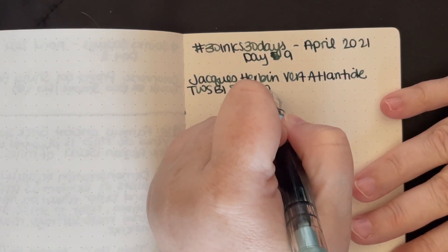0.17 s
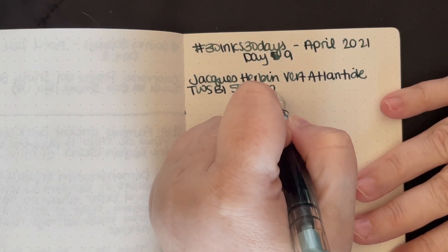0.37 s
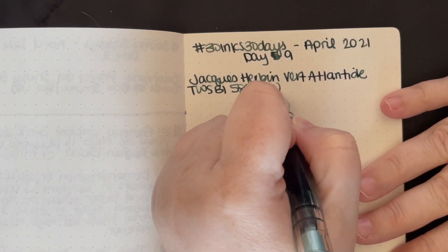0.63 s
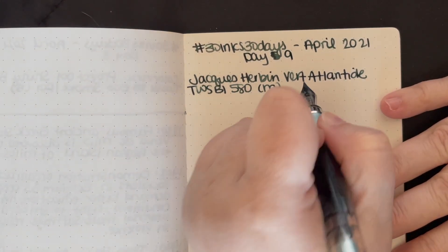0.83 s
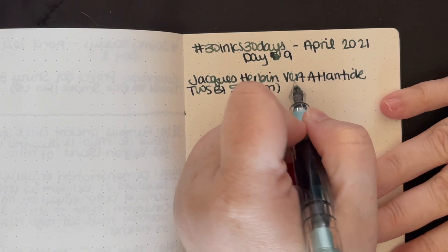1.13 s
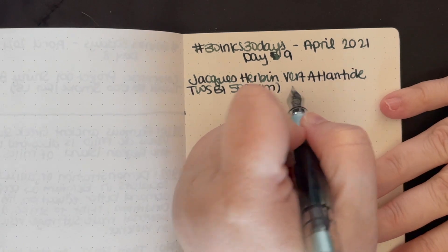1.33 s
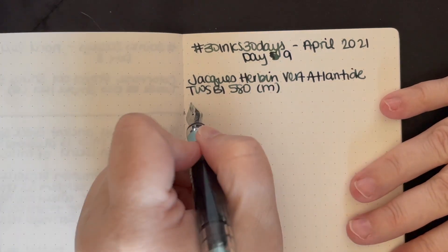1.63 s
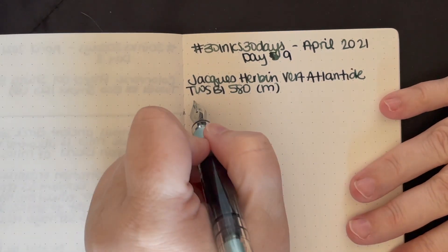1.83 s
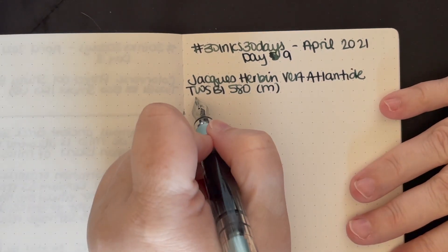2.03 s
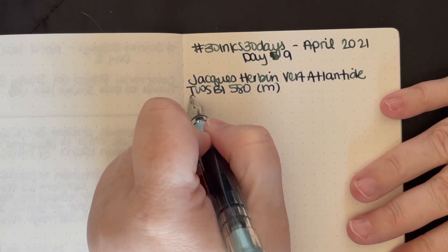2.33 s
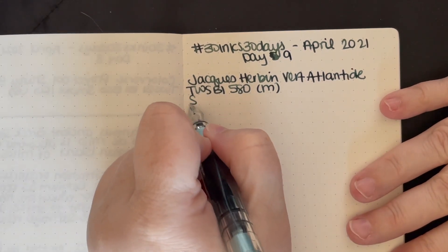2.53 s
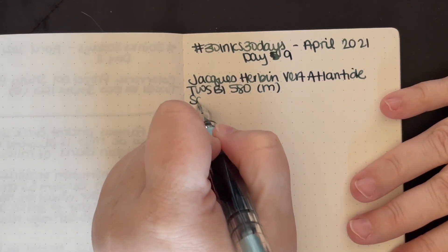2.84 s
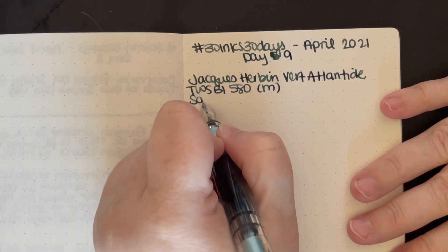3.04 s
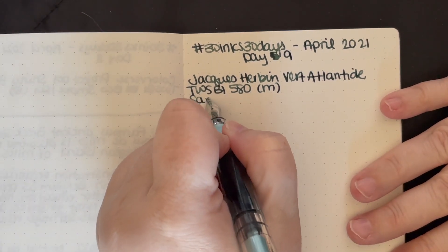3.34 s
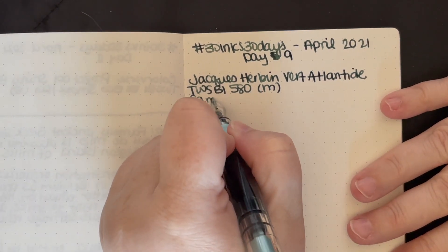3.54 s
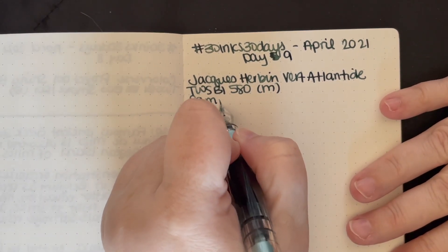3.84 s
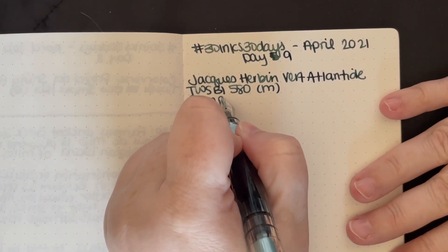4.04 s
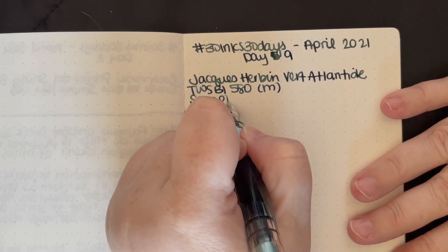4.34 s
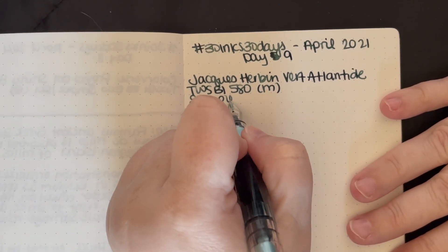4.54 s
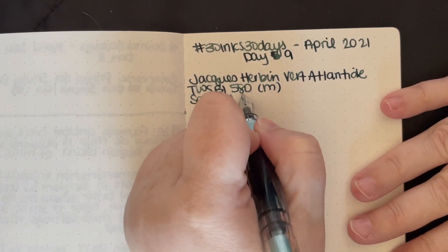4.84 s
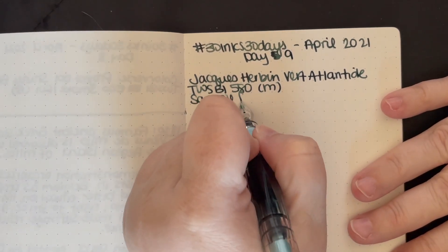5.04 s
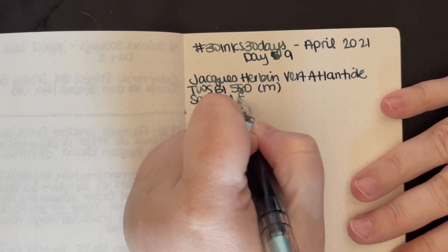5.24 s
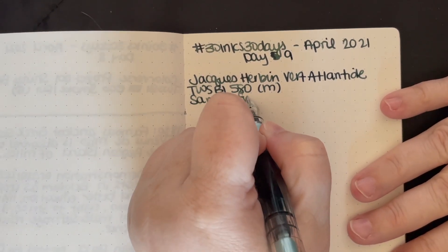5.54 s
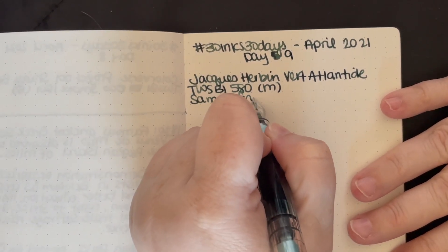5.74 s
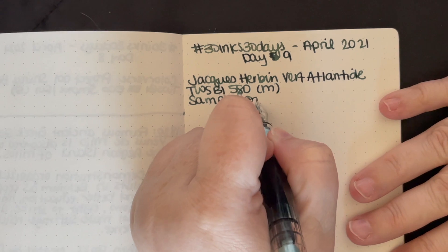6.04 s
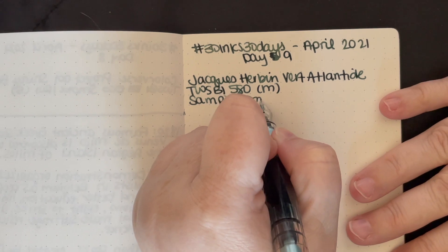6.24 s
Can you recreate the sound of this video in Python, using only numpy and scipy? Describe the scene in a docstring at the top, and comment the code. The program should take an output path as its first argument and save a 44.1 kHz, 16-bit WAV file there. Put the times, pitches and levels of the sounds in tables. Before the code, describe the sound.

Close up at a desk, skin slides softly across a notebook page a few times. A fountain pen then whispers through a run of small strokes, catching on paper fibres and tapping the page twice. Near the end the hand swishes again and the nib gives a faint, high, wavering tone as the writing continues. A steady low hum and airy hiss fill the quiet room.

```python
"""A hand brushes softly over paper, close to the microphone, at a desk in a quiet room.
Behind it lie ventilation, mains hum and microphone hiss, and the stand sways with the desk.
A fountain pen writes in the notebook: the wet nib whispers over the fibres, catches on some and
twice knocks on the page; late on, a thin tone wavers across several strokes. Between letters the
side of the hand slides along the paper."""
import sys
import numpy as np
from scipy import signal
from scipy.fft import rfft, irfft
from scipy.io import wavfile
from scipy.ndimage import map_coordinates

SR = 44100
rng = np.random.default_rng(int(sys.argv[2]) if len(sys.argv) > 2 else 0)


def to_wav(s):
    """Save 16-bit WAV."""
    ch = np.atleast_2d(s).T  # columns
    pcm = np.round(np.clip(ch, -1, 1) * 32767)  # PCM
    wavfile.write(sys.argv[1], SR, pcm.astype(np.int16))


N = 281799
TIME = np.arange(N) / SR

# the resting hand creeps: (start [s], rise [s], fall [s], level [dB], centre [Hz], width [Hz])
HAND_CREEPS = [(-.05, 0.12, 0.44, -63, 3720, 2700), (-.03, 0.12, 0.26, -63, 1280, 600),
               (.105, .035, 0.11, -63.5, 5400, 4200), (1.7, 0.55, 0.57, -70.5, 2050, 706),
               (4.75, 0.35, 1.8, -72.5, 1800, 804)]
# ventilation and microphone hiss: (frequency [Hz], relative density [dB])
AIR_SPECTRUM = [(25, -70.5), (50, -78), (85, -86.5), (150, -85.5), (205, -79.5), (240, -83.5), (330, -85),
                (380, -88), (450, -85), (660, -92), (800, -97.5), (1100, -94), (1450, -96.5),
                (1900, -101.5), (2600, -106.8), (7000, -106.8), (16000, -107.3)]
# mains lines, and a motor just below mains speed beating against them: (frequency [Hz], rms level [dB])
HUM_LINES = [(59.2, -77), (177.4, -62.5), (180, -60), (296, -73), (299.9, -63), (355.3, -68.5),
             (414.6, -68), (473.5, -75.5), (533, -85)]
# stand sway, strongest as the arm swings back to a new line and late in the word: (time [s], level [dB])
SWAY_LEVELS = [(0, -45), (.78, -42.5), (1.15, -47), (1.6, -37), (2.0, -52), (3.6, -43), (4.9, -39),
               (6.39, -41)]
# rumble of the swaying stand: (frequency [Hz], relative density [dB])
STAND_SPECTRUM = [(3, -14), (7, 2), (12, 0), (15, -7), (19.5, 0.5), (23, -15.5), (40, -32), (80, -65.5)]
# the hand slides: (start [s], rise [s], fall [s], hiss [dB], top octave against hiss [dB],
# low rub [dB], low edge of the hiss [Hz], pitch of the hollow [ratio])
HAND_SLIDES = [(.22, 0.047, 0.083, -57.5, -6, -61.5, 2400, 0.94),
               (.649, 0.018, 0.11, -54.5, -2.5, -70, 2400, 1),
               (1.296, 0.043, 0.12, -52, -1, -65, 2400, 0.996),
               (1.433, 0.057, 0.083, -47.5, -4.5, -58, 4000, 1.02),
               (4.553, 0.07, 0.08, -48, 0, -53.5, 3650, 1.03), (5.596, .016, 0.09, -60, 0, -68, 3500, 1.15)]
# hollow between hand and page, in three ranges: (frequency [Hz], width [Hz], relative level [dB])
HOLLOW_HISS_MODES = [(3080, 1100, 3.5), (4490, 820, 8), (5490, 800, 8), (7970, 1300, 8), (8900, 730, -1)]
HOLLOW_TOP_MODES = [(11860, 2300, -1.8), (14200, 1400, -0.66)]
HOLLOW_RUB_MODES = [(930, 380, 6.1), (1420, 110, 10.6), (1720, 1430, 0.83)]
# the nib catches on a fibre: (time [s], level [dB], centre [Hz], width [Hz], decay [s])
FIBRE_CATCHES = [(.246, -54, 12000, 7000, 0.0044), (0.801, -53.5, 2400, 2400, 0.0059),
                 (3.106, -59, 6000, 6500, .003), (3.228, -66, 8100, 450, .018),
                 (3.232, -63, 12500, 4000, 0.0084), (3.714, -62, 6000, 7000, 0.0042),
                 (4.19, -59, 13600, 2500, .003), (4.4, -60.5, 11500, 2030, .005),
                 (5.608, -61, 8030, 120.5, 0.028), (5.606, -55, 14200, 2500, 0.016)]
# strokes of the pen: (middle [s], length [s], scratch level [dB])
PEN_STROKES = [(0.54, 0.13, -66), (2.077, 0.11, -67.5), (2.229, 0.056, -68), (2.308, 0.077, -67),
               (2.369, 0.086, -65.5), (2.43, 0.057, -65.5), (2.487, 0.072, -66), (2.675, 0.084, -73),
               (2.772, .11, -63.5), (2.863, 0.081, -69.5), (2.974, 0.074, -67), (3.154, 0.095, -68.5),
               (3.253, 0.075, -68.5), (3.357, .1, -66.5), (3.48, 0.087, -69.5), (3.585, .11, -68),
               (3.785, 0.059, -68.5), (3.903, 0.087, -70), (4.03, 0.095, -69.5), (4.272, .1, -69.5),
               (4.359, 0.089, -69.5), (4.475, 0.058, -69), (4.81, 0.097, -67), (4.947, .13, -68),
               (5.117, .07, -75), (5.198, 0.066, -67.5), (5.358, .11, -73), (5.582, 0.077, -67.5),
               (5.69, 0.13, -69.5), (5.895, .07, -69.5), (6.016, 0.15, -74.5), (6.155, .06, -69.5),
               (6.28, 0.06, -70), (6.375, .045, -68)]
# nib, barrel and page under friction: (frequency [Hz], width [Hz], relative level [dB])
NIB_RESONANCES = [(4220, 480, 8.5), (5000, 360, 3), (5560, 490, 6), (7150, 350, 2.5), (7970, 620, 7),
                  (8650, 490, -11), (11700, 2500, -2), (14700, 1100, -12)]
BARREL_RESONANCES = [(3100, 340, -1.8), (3350, 310, 0)]
PAGE_RESONANCES = [(766, 320, 2), (1054, 205, 1.5), (1320, 470, -6), (1990, 210, -7.5)]
# the barrel's ring follows the grip: (time [s], level against the scratch [dB], pitch [ratio])
BARREL_GRIP = [(.54, -5, 0.96), (2.1, -18, 0.92), (2.22, 0.5, .98), (2.36, -.5, 1), (2.43, -5, 1),
               (2.49, -0.5, 1.06), (2.78, -3.5, 0.98), (2.97, 2, 1.05), (3.15, .5, 1), (3.3, -3.5, 1),
               (3.78, -3.5, 1), (3.9, 3, 1.04), (4.05, -6, 0.94), (4.8, -4, 1.02), (6.39, -5.5, 0.98)]
# the page gives under the pen and rubs hollowly: (middle [s], length [s], level [dB])
PAGE_GIVES = [(0.534, 0.13, -59.5), (2.358, 0.049, -58.5), (2.974, 0.043, -60)]
# the nib knocks: (time [s], push [dB], contact cut-off [Hz], bass cut-off [Hz], pad pitch [ratio])
NIB_KNOCKS = [(2.5123, -27, 1830, 238, 1.005), (4.6248, -28.5, 2320, 1400, 1.11)]
# pad and desk under a knock: (frequency [Hz], relative level [dB], t60 [s])
PAD_RESONANCES = [(380, -13, 0.032), (647, -4, 0.012), (1065, -0.5, 0.0058), (1470, -17, 0.011),
                  (1793, -11, 0.015)]
# short chirps around the long squeak: (start [s], length [s], pitch [Hz], glide [Hz/s], rms level [dB])
TINE_CHIRPS = [(4.909, 0.092, 4300, -1500, -75), (5.056, .11, 4120, 5000, -74),
               (5.616, 0.078, 5300, -6000, -78)]
# a thin, wavering tone near 5 kHz, held across several strokes: (time [s], pitch [Hz], rms level [dB])
TINE_SQUEAK = [(5.175, 5100, -92), (5.19, 5130, -70), (5.24, 5150, -71), (5.31, 5020, -77),
               (5.39, 5060, -75), (5.44, 5230, -71), (5.485, 5320, -82), (5.53, 5350, -90)]


def from_db(db):
    """Decibels to gain."""
    return 10 ** (np.asarray(db) / 20)


def rms_one(x):
    """Scale to rms 1."""
    return x / np.sqrt(np.mean(x ** 2) + 1e-20)


def drift(rate):
    """Random wander of rms 1 that changes about rate times a second."""
    hz = np.arange(N // 2 + 1) * SR / N
    return rms_one(irfft(rfft(rng.standard_normal(N)) / (1 + (hz / rate) ** 2), N))


def coloured_noise(spectrum):
    """Noise of rms 1 with the given outline: (frequency [Hz], relative density [dB])."""
    hz, db = np.transpose(spectrum)
    bins = np.maximum(np.arange(N // 2 + 1) * SR / N, 1)
    gain = from_db(np.interp(np.log(bins), np.log(hz), db))
    return rms_one(irfft(rfft(rng.standard_normal(N)) * gain, N))


def cut(x, hz, kind, order=2):
    """Butterworth low- or high-pass."""
    return signal.sosfilt(signal.butter(order, hz, kind, fs=SR, output="sos"), x)


def resonate(x, hz, width):
    """One resonance with gain 1 on top; two broad stages in a row give it steep skirts."""
    r = np.exp(-np.pi * width * (np.pi / 2) / SR)
    gain = (1 - r * r) / 2
    return signal.sosfilt([[gain, 0, -gain, 1, -2 * r * np.cos(2 * np.pi * hz / SR), r * r]] * 2, x)


def ring(x, hz, t60):
    """A unit click sets a sine of height 1 ringing."""
    r, w = np.exp(-np.log(1000) / (t60 * SR)), 2 * np.pi * hz / SR
    return signal.lfilter([0, np.sin(w)], [1, -2 * r * np.cos(w), r * r], x + 1e-18)


def bend(x, ratio):
    """Shift the pitch of a steady sound by a ratio that changes with time."""
    return map_coordinates(x, [np.cumsum(ratio)], order=3, mode="mirror")


def friction(modes, slips_per_s, spread_db, pitch=1, size=N):
    """Countless tiny slips of uneven size drive each resonance; rms 1."""
    out = 0
    for hz, width, db in modes:
        sizes = from_db(spread_db * np.minimum(rng.exponential(1, size), 4))
        slips = sizes * rng.choice([-1, 1], size) * (rng.random(size) < slips_per_s / SR)
        out = out + from_db(db) * resonate(slips, hz * pitch, width)
    return rms_one(out)


def swell(start, rise, fall):
    """Speed of one hand movement: from rest up to 1 and back to rest."""
    return np.sin(np.pi / 2 * np.interp(TIME, [start, start + rise, start + rise + fall], [0, 1, 0]))


def hand_creeps():
    """Slow skin on paper, close up: a soft, broad brushing."""
    out = np.zeros(N)
    for start, rise, fall, db, hz, width in HAND_CREEPS:
        brush = friction([(hz, width, 0)], slips_per_s=10000, spread_db=-5.5)
        out += from_db(db) * swell(start, rise, fall) * brush
    return out


def room_air(level_db):
    """Steady ventilation in the room, with the microphone's own hiss."""
    return from_db(level_db) * coloured_noise(AIR_SPECTRUM)


def mains_hum(buzz_hz, buzz_start_db, growth_db_per_s, waver_db, wander_rad):
    """An appliance's mains and motor lines waver; its magnetic buzz at twice mains pitch slowly grows."""
    out = np.zeros(N)
    for hz, db in [(buzz_hz, buzz_start_db + growth_db_per_s * TIME), *HUM_LINES]:
        height = np.sqrt(2) * from_db(db + waver_db * drift(2.1))
        phase = 2 * np.pi * (hz * TIME + rng.random()) + wander_rad * drift(3.0)
        out += height * np.sin(phase)
    return out


def stand_sway():
    """The microphone stand sways with the desk: a very deep rumble."""
    s, db = np.transpose(SWAY_LEVELS)
    return from_db(np.interp(TIME, s, db)) * coloured_noise(STAND_SPECTRUM)


def hand_slides(flutter_db):
    """Skin swishes over the page, swelling and fading with the speed of each slide."""
    out, size = np.zeros(N), SR // 4
    for start, rise, fall, hiss_db, top_db, rub_db, edge_hz, pitch in HAND_SLIDES:
        hiss, top, rub = [friction(modes, slips_per_s=9200, spread_db=2.5, pitch=pitch, size=size)
                          for modes in (HOLLOW_HISS_MODES, HOLLOW_TOP_MODES, HOLLOW_RUB_MODES)]
        treble = (cut(hiss, edge_hz, "high", order=8) + from_db(top_db) * top) / np.sqrt(2)
        swish = from_db(hiss_db) * treble + from_db(rub_db) * rub
        span = slice(round(start * SR), round(start * SR) + size)
        out[span] += swell(start, rise, fall)[span] ** 2 * swish
    return out * from_db(flutter_db * drift(45))


def fibre_ticks():
    """A fibre caught by the nib lets go with a tiny dry rasp."""
    out = np.zeros(N)
    for s, db, hz, width, decay in FIBRE_CATCHES:
        fade = (TIME >= s) * np.exp(-np.maximum(TIME - s, 0) / decay)
        out += from_db(db) * fade * rms_one(resonate(rng.standard_normal(N), hz, width))
    return out


def stroke(middle, length):
    """Loudness of one stroke: the root of the nib's speed, which rises and falls as a half sine."""
    out = np.zeros(N)
    down = np.abs(TIME - middle) < length / 2
    out[down] = np.sqrt(np.cos(np.pi * (TIME[down] - middle) / length))
    return out


def nib_scratch(flutter_db, tilt_wander, page_db):
    """The nib drags over the fibres and sets barrel and page ringing; grip and tilt bend the pen's pitch."""
    scratch, barrel, page = [friction(modes, slips_per_s=4500, spread_db=4.0)
                             for modes in (NIB_RESONANCES, BARREL_RESONANCES, PAGE_RESONANCES)]
    drag = sum(from_db(db) * stroke(middle, length) for middle, length, db in PEN_STROKES)
    give = sum(from_db(db) * stroke(middle, length) for middle, length, db in PAGE_GIVES)
    s, ring_db, grip_pitch = np.transpose(BARREL_GRIP)
    tilt = 1 + tilt_wander * drift(12)
    barrel_pitch = tilt * np.interp(TIME, s, grip_pitch)
    ringing = from_db(np.interp(TIME, s, ring_db)) * bend(barrel, barrel_pitch)
    pen = drag * (bend(scratch, tilt) + ringing)
    page_rub = np.maximum(from_db(page_db) * drag, give) * page
    return (pen + page_rub) * from_db(flutter_db * drift(35))


def nib_knocks():
    """The nib lands on the soft stack of pages: a dull, quickly damped tock."""
    out = np.zeros(N)
    for s, db, contact_hz, bass_hz, pitch in NIB_KNOCKS:
        push = np.zeros(N)
        push[round(s * SR)] = -from_db(db)
        body = sum(from_db(mode_db) * ring(push, hz * pitch, t60) for hz, mode_db, t60 in PAD_RESONANCES)
        out += cut(cut(body, contact_hz, "low", order=6), bass_hz, "high")
    return out


def room_echo(x, t60, wall_hz):
    """The walls scatter a short, dull tail back to the microphone."""
    age = TIME[:SR // 2]
    fade = np.exp(-np.log(1000) * age / t60) * (age > .004)
    tail = cut(rng.standard_normal(len(age)), wall_hz, "low") * fade
    return signal.fftconvolve(x, tail / np.sqrt(np.sum(tail ** 2)))[:N]


def tine_chirps(jitter_hz):
    """The tines sing for a moment, in a rough glide."""
    out = np.zeros(N)
    jitter = jitter_hz * drift(158)
    for start, length, hz, glide, db in TINE_CHIRPS:
        phase = 2 * np.pi * np.cumsum(hz + glide * (TIME - start) + jitter) / SR
        out += np.sqrt(2) * from_db(db) * stroke(start + length / 2, length) * np.sin(phase)
    return out


def tine_squeak(jitter_hz, flutter_db):
    """The tines stick and slip at their own pitch: a thin, unsteady tone."""
    s, hz, db = np.transpose(TINE_SQUEAK)
    phase = 2 * np.pi * np.cumsum(np.interp(TIME, s, hz) + jitter_hz * drift(110)) / SR
    height = np.sqrt(2) * np.interp(TIME, s, from_db(db), left=0, right=0)
    return height * from_db(flutter_db * drift(40)) * np.sin(phase)


def scene():
    """One microphone at the desk: pen and hand close up, the steady room behind."""
    knocks = nib_knocks()
    pen = knocks + nib_scratch(flutter_db=1.5, tilt_wander=.015, page_db=-0.5)
    pen += tine_squeak(jitter_hz=30.2, flutter_db=2.5) + tine_chirps(jitter_hz=50.2) + fibre_ticks()
    hand = hand_slides(flutter_db=0.9) + hand_creeps()
    echo = from_db(-23.0) * room_echo(knocks, t60=1.0, wall_hz=2000)
    background = stand_sway() + room_air(level_db=-51.5)
    hum = mains_hum(buzz_hz=120.06, buzz_start_db=-70, growth_db_per_s=1.5, waver_db=0.6, wander_rad=0.16)
    return (pen + hand + echo + background + hum)[None]


def record(dry):
    """The top is cut steeply above 15.7 kHz."""
    return signal.sosfilt(signal.ellip(12, .1, 80, 15700, fs=SR, output="sos"), dry)


dry = scene()
out = record(dry)
to_wav(out)
```